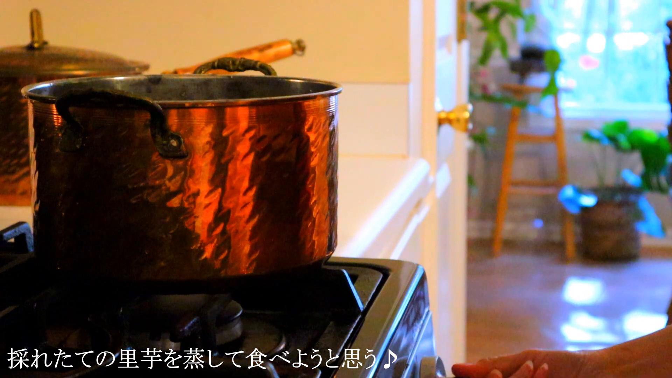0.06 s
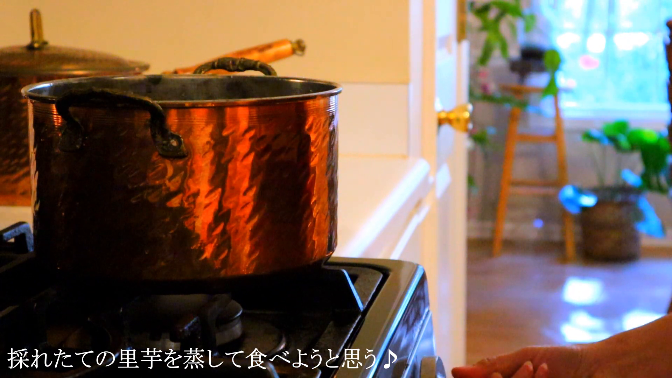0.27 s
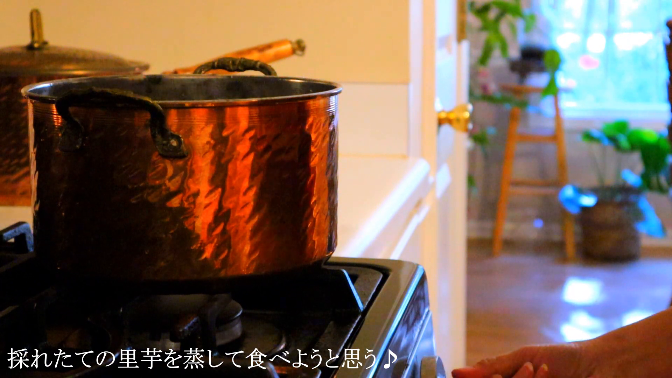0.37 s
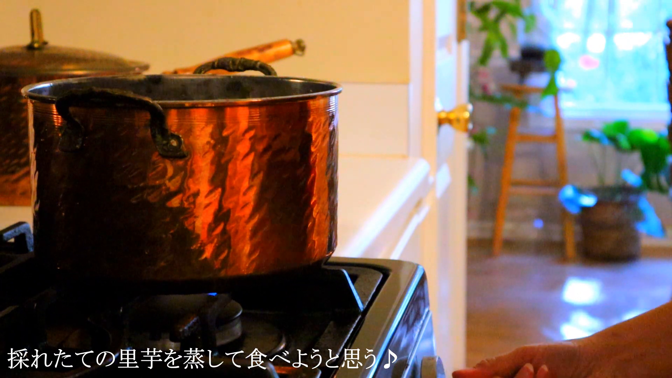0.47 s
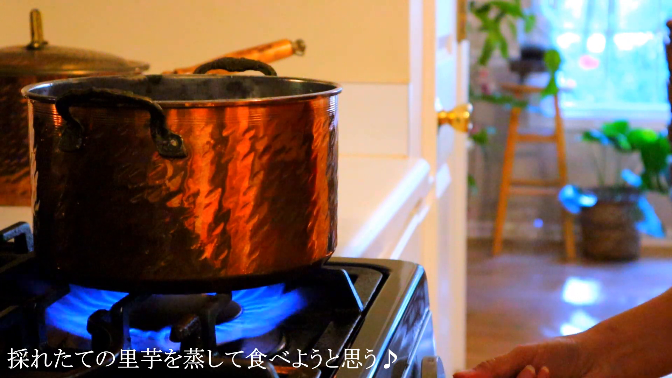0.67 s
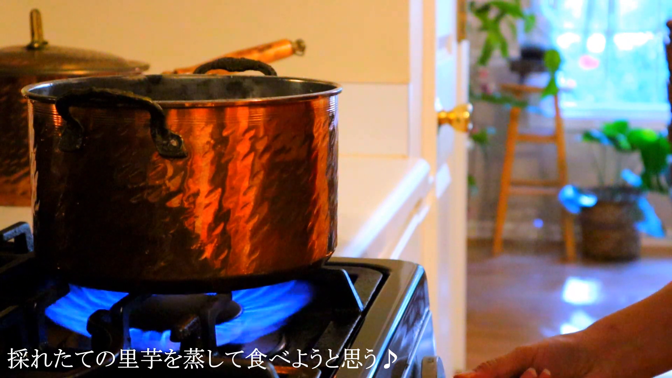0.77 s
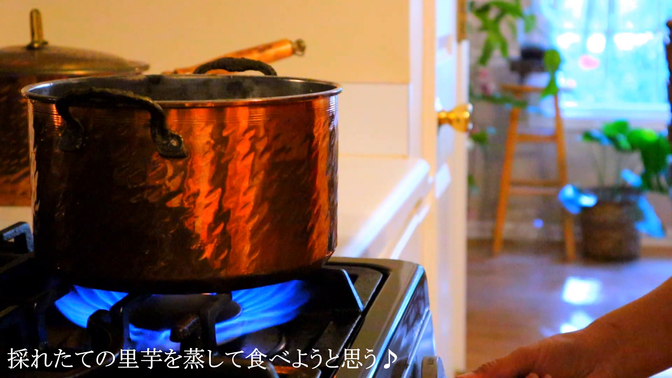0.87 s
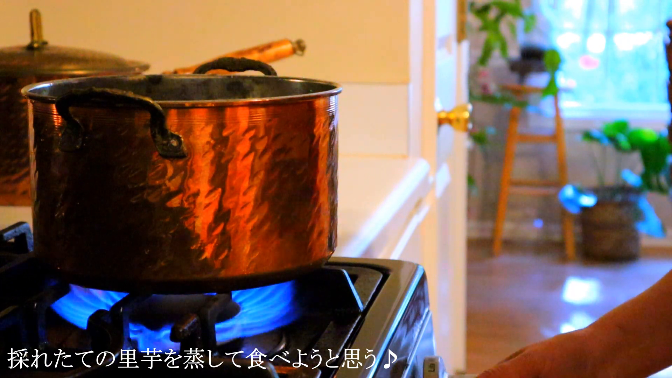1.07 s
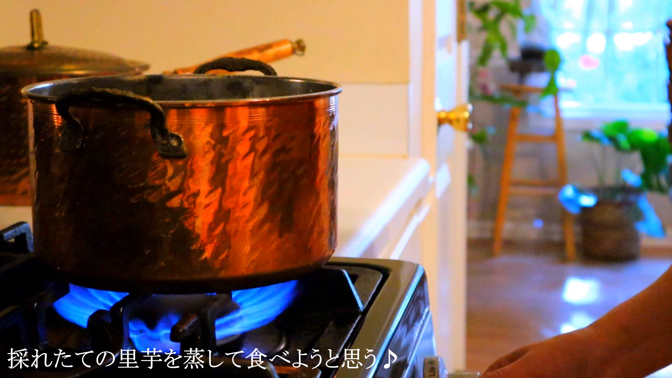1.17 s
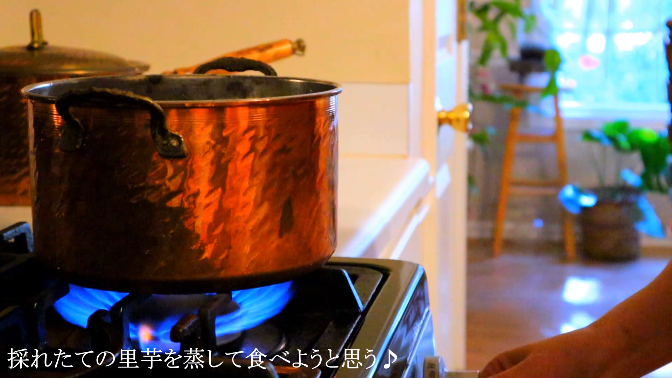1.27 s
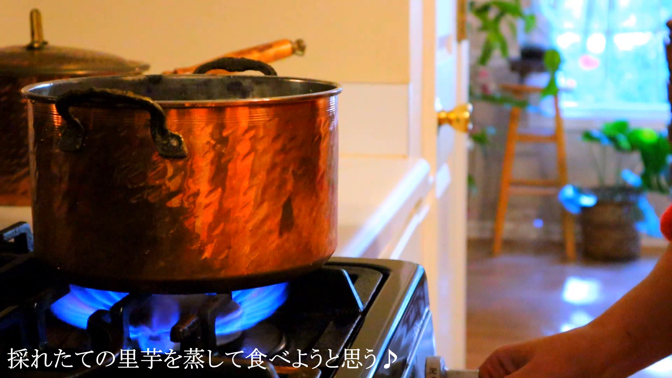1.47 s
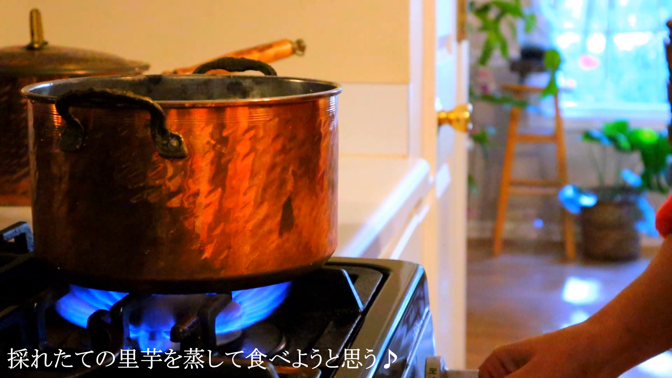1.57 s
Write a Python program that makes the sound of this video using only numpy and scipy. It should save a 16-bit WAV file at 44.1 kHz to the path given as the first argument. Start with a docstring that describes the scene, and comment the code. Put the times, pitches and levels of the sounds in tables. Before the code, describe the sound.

Close stereo pickup of a gas hob being lit under a metal pot: a faint knob tick, five crisp ringing sparks with short room echo, a small popping whoof midway, then quiet steady flame and dull knob clunks.

```python
"""Lighting a gas hob

A gas hob is lit under a copper pot in a kitchen. Five sparks come, five a second: each is a sharp pulse
that bounces between burner and pot, makes the gap ring, and lives on as fading noise in the room.
The third spark lights the gas: low fluttering noise makes a short whoomph, with small pops. The flame
settles to a soft hiss of steady noises, and ticks and dull knocks tell of the hand on the knob."""
import sys
import numpy as np
from scipy import signal
from scipy.fft import rfft, irfft
from scipy.io import wavfile

SR = 44100
rng = np.random.default_rng(int(sys.argv[2]) if len(sys.argv) > 2 else 0)


def pcm_store(signal):
    """Save signal as 16-bit PCM."""
    levels = np.round(np.clip(np.atleast_2d(signal), -1, 1) * 32767)
    wavfile.write(sys.argv[1], SR, levels.astype(np.int16).T)


N = 70560
TIME = np.arange(N) / SR  # s
HZ = np.maximum(np.fft.rfftfreq(2 * N, 1 / SR), 1)

# the gas catches, and the flame is all round the burner (s)
FLARE_S, FLARE_END_S = 0.612, 0.772

# how alike left and right are in air, flame and knob: f/Hz, likeness (-1 opposite, 1 same)
AIR_LIKENESS = [(25, 0.82), (60, 1), (150, 0.74), (380, 0.11), (950, 0.28), (2400, -0.51), (15000, -0.12)]


def from_db(db):
    """Turn decibels into a gain."""
    return 10 ** (np.asarray(db) / 20)


def rms_one(x):
    """Scale to an average strength (rms) of 1."""
    return x / np.sqrt(np.mean(x ** 2) + 1e-20)


def at_hz(points, hz=HZ):
    """Read a table between its points, on a log-frequency axis as the ear hears pitch."""
    table = np.array(points)
    return np.interp(np.log(hz), np.log(table[:, 0]), table[:, 1])


def filtered(x, response):
    """Change each frequency of a sound by a response."""
    return irfft(rfft(x, 2 * N) * response)[..., :N]


def causal(db):
    """Minimum-phase response with these gains: nothing sounds early."""
    cepstrum = irfft(np.log(from_db(db)))
    folded = np.r_[cepstrum[0], 2 * cepstrum[1:N]]
    return np.exp(rfft(folded, 2 * N))


def delay(s):
    """A pure delay turns the phase in step with frequency."""
    return np.exp(-2j * np.pi * HZ * s)


def two_ears(s, lag_ms):
    """Delay to the left ear, and to the right ear a little later (or earlier, if negative)."""
    return np.array([delay(s), delay(s + lag_ms / 1000)])


def noise(spectrum, likeness):
    """Stereo noise of a given colour and left-right likeness; rms 1."""
    mid, side = rfft(rng.standard_normal((2, 2 * N)))
    alike = np.clip(at_hz(likeness), -.99, .99)
    # the side part has opposite sign in the two ears
    both = np.sqrt(1 + alike) * mid + np.sqrt(1 - alike) * side * [[1], [-1]]
    coloured = both * from_db(at_hz(spectrum))
    return rms_one(irfft(coloured)[:, :N])


def drift(rate):
    """Random wandering, mostly slower than rate in Hz; rms 1."""
    slowed = rfft(rng.standard_normal(2 * N)) / (1 + (HZ / rate) ** 2)
    return rms_one(irfft(slowed)[:N])


def narrow(hz, width):
    """Stereo noise gathered round one pitch, steady or gliding: slow chance shakes a tone; rms near 1."""
    phase = 2 * np.pi * np.cumsum(hz * np.ones(N)) / SR
    return np.array([drift(width) * np.cos(phase) + drift(width) * np.sin(phase) for _ in range(2)])


def burst(start, rise, t60):
    """Envelope that swells and dies away; the fade loses 60 dB in t60 seconds."""
    age = np.maximum(TIME - start, 0)
    return (1 - np.exp(-age / rise)) * np.exp(-np.log(1000) * age / t60)


def kitchen_air(lit):
    """Steady background noise that drops a little as the flame comes to burn."""
    # colour of the air: f/Hz, level/dB per Hz (relative)
    air_colour = [(20, -12), (55, -2), (140, -5), (380, -6), (700, -8), (1900, -10), (4000, -12.5),
                  (7000, -22), (12000, -26), (15000, -45)]
    level_db, dip_db = -51.5, -4.5
    return from_db(level_db + dip_db * lit) * noise(air_colour, AIR_LIKENESS)


def knob():
    """Pressing the knob and letting go: short noise ticks near one pitch, and dull knocks in the hob."""
    # touches: t/s, tick level/dB, tick f/Hz, tick left minus right/dB, knock level/dB
    touches = [(0.099, -46, 3470, 3, -62), (1.232, -46, 5600, 2, -39), (1.275, -62, 5000, 5, -51.5),
               (1.31, -69, 5000, 2, -54.5), (1.3357, -48, 6160, 2, -51)]
    # how the hob's body colours a knock: f/Hz, level/dB per Hz (relative)
    hob_body = [(60, -10), (140, -2), (380, 8.5), (700, 0.5), (1000, -1), (1220, 3), (1600, -9),
                (4000, -35), (12000, -55)]
    tick_rise_s, tick_t60_s = 0.00038, 0.11
    knock_rise_s, knock_t60_s = 0.0026, 0.18
    out = 0
    for s, tick_db, hz, pan_db, knock_db in touches:
        tick_colour = [(hz / 2, -16), (hz, 0), (hz * 2, -18), (hz * 3, -50)]
        tick = noise(tick_colour, AIR_LIKENESS) * burst(s, tick_rise_s, tick_t60_s)
        tick_gain = from_db(tick_db + pan_db * np.array([[.5], [-.5]]))
        knock = noise(hob_body, AIR_LIKENESS) * burst(s, knock_rise_s, knock_t60_s)
        out = out + tick_gain * tick + from_db(knock_db) * knock
    return out


def burner(lit):
    """Rush and low roar of the flame, a slowly sinking hollow note, and gas hissing through the mixing tube."""
    # colours of rush, roar and gas jet: f/Hz, level/dB per Hz (relative)
    flame_colour = [(30, -23), (60, -5), (140, 2), (280, -4), (700, -6.5), (1000, -4), (1800, -8),
                    (2400, -12), (4500, -9.5), (7000, -24), (11500, -10), (14000, -30)]
    roar_colour = [(30, -27), (65, -8.5), (145, -0.5), (260, -14.5), (800, -9), (3000, -56)]
    jet_colour = [(1500, -13), (4000, 5), (7000, 4), (10000, 0.5), (11500, 8.5), (12500, -27), (15000, -38)]
    # loudness of the gas hiss: t/s, level/dB
    jet_level = [(.2, -73), (.6, -52.5), (1.2, -57), (1.36, -53), (1.45, -61.5), (1.6, -63.5)]
    # resonances of the mixing tube: f/Hz, width/Hz, level/dB
    tube_modes = [(2287, 180, -61.5), (3240, 180, -64.5), (3800, 43, -67.5), (4570, 97, -63.5),
                  (6100, 270, -72), (7400, 82, -75), (10100, 140, -70.5), (11800, 200, -80)]

    flame_db, flicker_db = -58, 1.5
    rush = from_db(flame_db + flicker_db * drift(11)) * noise(flame_colour, AIR_LIKENESS)

    # the low roar grows quickly as the flame draws
    roar_db, roar_from_s, roar_full_s = -56.5, 1.18, 1.19
    roar_growth = np.interp(TIME, [roar_from_s, roar_full_s], [0, 1])
    roar = from_db(roar_db) * roar_growth * noise(roar_colour, AIR_LIKENESS)

    # hollow note of the burner ports; it has its start pitch when the gas catches
    start_hz, sag_hz_per_s, width_hz, note_db = 1480, 140, 94, -58
    note_hz = start_hz - sag_hz_per_s * (TIME - FLARE_S)
    note = from_db(note_db) * narrow(note_hz, width_hz)

    tube = sum(from_db(db) * narrow(hz, width) for hz, width, db in tube_modes)
    jet_db = np.interp(TIME, *np.transpose(jet_level))
    jet = from_db(jet_db) * noise(jet_colour, AIR_LIKENESS)
    return lit * (rush + note + tube) + roar + jet


def flare():
    """The flame runs round the burner: a fluttering low rush of noise with a few brighter pops."""
    # colours of the rush and of the pops: f/Hz, level/dB per Hz (relative)
    flare_colour = [(30, -39), (60, -13), (92, 4), (115, -11), (135, 2.5), (270, -16.5), (330, -8.5),
                    (520, -15), (620, -7), (860, -10), (1150, -22), (2200, -26), (5000, -56), (12000, -65)]
    pop_colour = [(30, -18), (70, -3), (140, 2), (300, -10.5), (700, -1), (1100, -12.5), (2200, -9),
                  (5000, -41), (12000, -65)]
    # left-right likeness: f/Hz, likeness (-1 opposite, 1 same)
    flare_likeness = [(60, 1), (550, 0.94), (1700, 0.58), (5000, 0.22)]
    # pops as the ports light: t/s, level/dB
    port_pops = [(0.6446, -30), (0.661, -29), (0.701, -29), (0.738, -25.5), (0.7776, -29)]
    rise_s, t60_s, flare_db = 0.041, 0.22, -37.5
    flutter_db, flutter_hz = 2, 58
    pop_rise_s, pop_t60_s = 0.00077, 0.021

    growth = np.clip((TIME - FLARE_S) / rise_s, 0, 1)
    fade = np.exp(-np.log(1000) * np.maximum(TIME - FLARE_END_S, 0) / t60_s)
    flutter = from_db(flare_db + flutter_db * drift(flutter_hz))
    rush = noise(flare_colour, flare_likeness) * growth * fade * flutter
    pop_envelope = sum(from_db(db) * burst(s, pop_rise_s, pop_t60_s) for s, db in port_pops)
    return rush + noise(pop_colour, flare_likeness) * pop_envelope


def room_echo():
    """The kitchen's answer to a snap: near walls, then the far one, dying at its own rate in each octave."""
    # colour of the echo: f/Hz, level/dB per Hz (relative)
    room_colour = [(70, -36), (220, -30), (1000, -21), (2200, -11.5), (4000, -6.5), (6000, -2.5), (7700, 1),
                   (10300, -1.5), (12000, -4.5), (13500, -18), (15000, -44)]
    # left-right likeness: f/Hz, likeness (-1 opposite, 1 same)
    room_likeness = [(200, .2), (1400, 0), (3100, -.35), (6800, .1), (15000, .1)]
    # time to fade by 60 dB: f/Hz, t60/s
    room_t60 = [(300, 0.19), (2000, 0.48), (7000, 0.53), (13000, 0.28)]
    near_rise_s = 0.0044
    # a second swell comes back from the far end of the room
    far_s, far_rise_s, far_db = 0.038, 0.016, -3.5

    wash, out = noise(room_colour, room_likeness), 0
    centres = 250 * 2 ** np.arange(7)  # octave bands, Hz
    for hz, pick in zip(centres, np.eye(len(centres))):
        # each band fades over into its neighbours
        band = filtered(wash, np.interp(np.log(HZ), np.log(centres), pick))
        t60 = at_hz(room_t60, hz)
        near_walls = burst(0, near_rise_s, t60)
        far_wall = from_db(far_db) * burst(far_s, far_rise_s, t60)
        out = out + band * np.hypot(near_walls, far_wall)
    return out


def igniter():
    """Each spark is one sharp pulse that bounces, scatters and rings under the pot, then fills the room."""
    # sparks: t/s, level/dB, room level/dB, extra echo fade/(dB per s), tilt/(dB per octave),
    # body below 1 kHz/dB, right ear lag/ms
    sparks = [(.2085, 7.8, .7, 0, -.2, 1, .064), (.4081, 1.3, 0, 8, -.6, 1.5, 0),
              (.6080, 1.6, 0, 8, -.4, 3.5, 0), (.8080, 2, -1.2, 16, .7, -.5, .02),
              (1.0082, 1.5, -3, 28, .4, -2.5, .02)]
    # the snap and its first bounces off hob and pot: delay/ms, level/dB, right ear lag/ms
    bounce_paths = [(0, -11, 0.07), (.28, -8.5, 0.017), (.72, 7.5, -0.0041), (1.0, -13, 0.004),
                    (2.2, -7, 0.031), (3.6, -13, -0.053)]
    # colour of the snap and its scatter: f/Hz, level/dB per Hz
    snap_colour = [(70, -36), (220, -25), (900, -23.5), (1600, -15), (3000, -11), (4300, -9.5), (5000, -9),
                   (7500, -6), (9500, -6), (12200, -7), (14000, -19.5), (16000, -39)]
    # left-right likeness of the scatter: f/Hz, likeness (-1 opposite, 1 same)
    scatter_likeness = [(300, 0), (3500, -.6), (5500, .2), (14000, .2)]
    # the gap between burner and pot rings: f/Hz, level/dB, t60/s
    burner_modes = [(3020, -33.5, 0.022), (4100, -37, 0.0053), (6260, -21, 0.013), (7260, -13, 0.021),
                    (7600, -19.5, 0.029), (8620, -24, 0.04), (9850, -23, 0.024)]
    pulse_db, room_base_db = 2.5, -27
    ring_db, ring_spread_db, ring_rise_s = -0.5, 1.5, 0.0003
    scatter_db, scatter_rise_s, scatter_t60_s = -12, 0.0008, 0.04
    body_hz = 980
    # share (in power) of scatter and echo that is new at each spark
    renewed = 0.52
    keep_gain, new_gain = np.sqrt(1 - renewed), np.sqrt(renewed)

    bounces = sum(from_db(db) * two_ears(ms / 1000, lag_ms) for ms, db, lag_ms in bounce_paths)
    snap = from_db(pulse_db) * irfft(bounces * causal(at_hz(snap_colour)))[:, :N]
    shared_scatter, shared_room = noise(snap_colour, scatter_likeness), room_echo()
    out = 0
    for s, spark_db, room_db, fade_db_per_s, tilt_db, body_db, lag_ms in sparks:
        ring = 0
        for hz, db, t60 in burner_modes:
            gain = from_db(ring_db + db + rng.normal(0, ring_spread_db))
            tone = np.sin(2 * np.pi * (hz * TIME + rng.random()))
            ring = ring + gain * tone * burst(0, ring_rise_s, t60)
        direct = filtered(snap + ring, two_ears(s, lag_ms))

        spray = keep_gain * shared_scatter + new_gain * noise(snap_colour, scatter_likeness)
        near = from_db(scatter_db) * spray * burst(0, scatter_rise_s, scatter_t60_s)
        echo = keep_gain * shared_room + new_gain * room_echo()
        far = from_db(room_base_db + room_db - fade_db_per_s * TIME) * echo

        # the tilt turns about 7 kHz and stops at body_hz; below, the body part takes over
        tilt = tilt_db * np.log2(np.maximum(HZ, body_hz) / 7000)
        body = body_db / (1 + (HZ / body_hz) ** 2)
        # spark_db sets the direct sound only; scatter and echo have their own levels
        spark = from_db(spark_db) * direct + filtered(near + far, delay(s))
        out = out + filtered(spark, causal(tilt + body))
    return out


def scene():
    """Igniter, flame and knob sound together over the kitchen's quiet air."""
    # 0 before the gas catches, 1 once the flame is all round
    lit = np.clip((TIME - FLARE_S) / (FLARE_END_S - FLARE_S), 0, 1)
    return kitchen_air(lit) + knob() + burner(lit) + flare() + igniter()


def record(dry):
    """Loud peaks are rounded off towards full scale, then a steep filter cuts the top."""
    stop_hz = 16900  # from here up, at least 70 dB down
    top_cut = signal.cheby2(14, 70, stop_hz, fs=SR, output="sos")
    return signal.sosfilt(top_cut, np.tanh(dry))


dry = scene()
out = record(dry)
pcm_store(out)
```